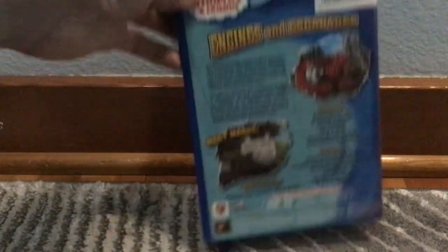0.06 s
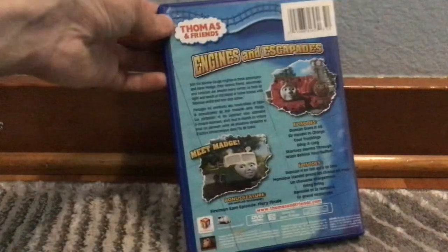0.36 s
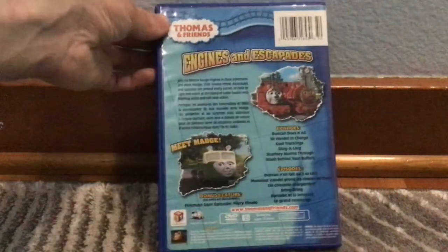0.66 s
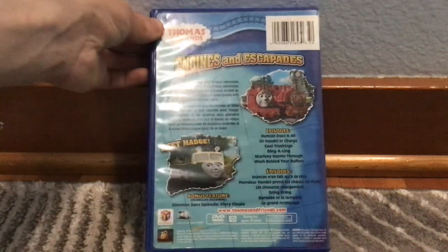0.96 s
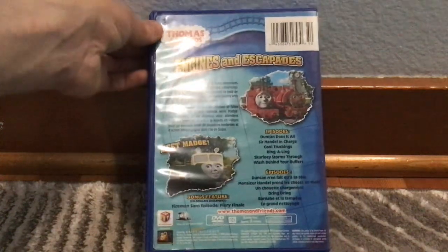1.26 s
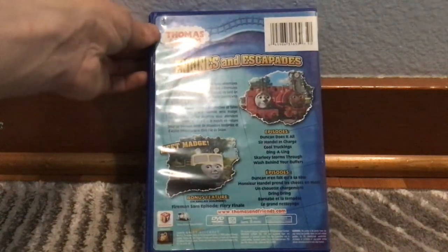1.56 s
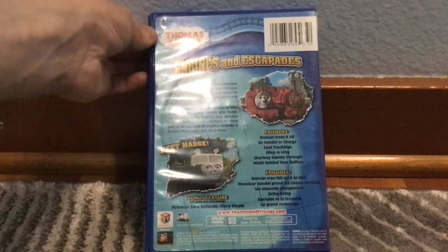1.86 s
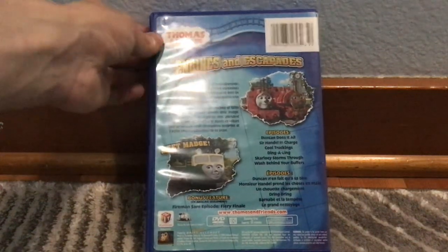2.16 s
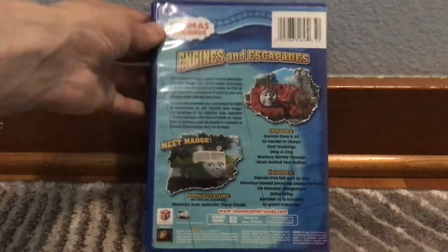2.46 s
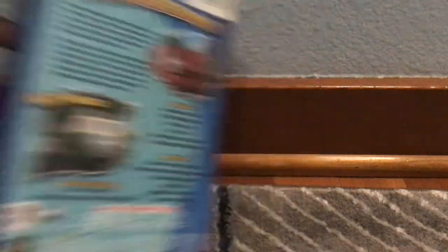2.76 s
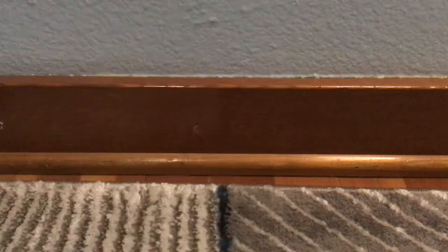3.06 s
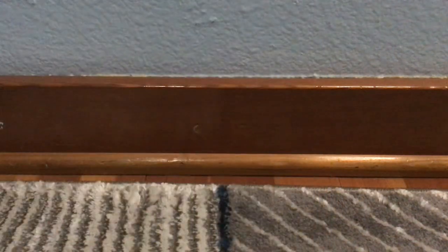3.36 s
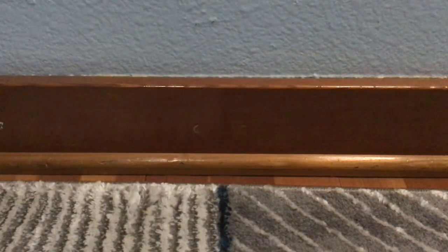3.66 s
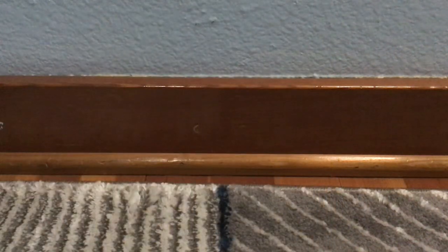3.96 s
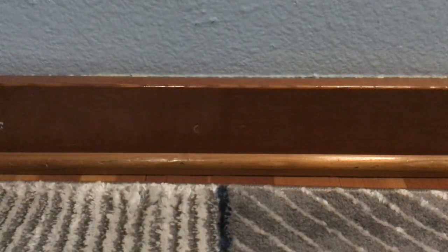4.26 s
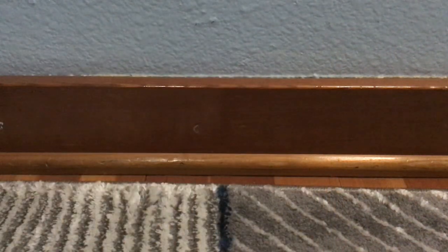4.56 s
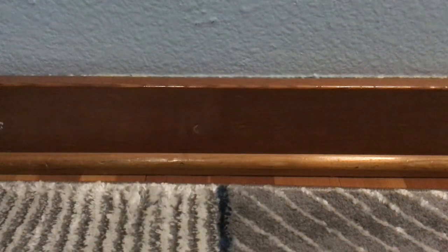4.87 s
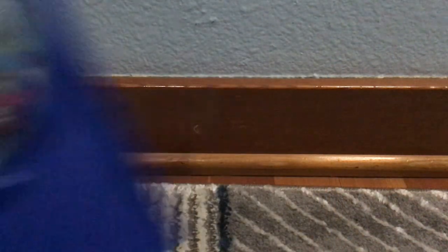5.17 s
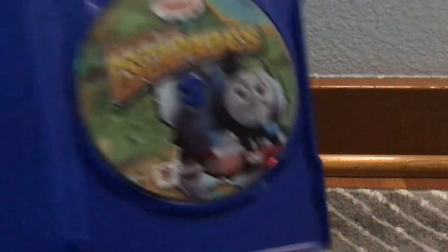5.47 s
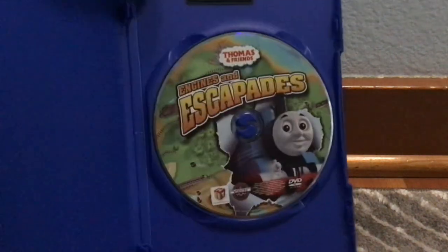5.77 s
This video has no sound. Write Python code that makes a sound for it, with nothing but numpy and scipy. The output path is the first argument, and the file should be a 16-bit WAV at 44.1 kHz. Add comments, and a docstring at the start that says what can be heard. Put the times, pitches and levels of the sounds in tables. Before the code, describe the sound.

A hand knocks a plastic disc case down on a rug, handles it with faint ticks, then snaps it open in a quiet room.

```python
"""Plastic disc case, handled and opened

A hand stands the case on a rug, shifts its grip, lifts it away and snaps it open. It knocks and rocks
to rest, creaks in the grip, and ticks and squeaks as fingers slide on shell and sleeve. The latches
let go in one quick ripple. Small quiet room, appliance hum, one close microphone."""
import sys
import numpy as np
from scipy import signal
from scipy.fft import rfft, irfft
from scipy.io import wavfile
from scipy.ndimage import uniform_filter1d

SR = 44100
rng = np.random.default_rng(int(sys.argv[2]) if len(sys.argv) > 2 else 0)


def wrap_up_sound(samples):
    """Save the sound to the file named by the first command line argument, as 16-bit audio."""
    columns = np.atleast_2d(samples).T
    # keep every value between -1 and 1, then stretch to whole-number steps
    tamed = np.clip(columns, -1, 1)
    steps = np.round(tamed * 32767).astype(np.int16)
    wavfile.write(sys.argv[1], SR, steps)


N = 256220
TAPS = 16384
HZ, AGE_S = np.fft.rfftfreq(TAPS, 1 / SR), np.arange(TAPS) / SR

# Broad shell spectrum. Each row: frequency in Hz, gain in dB.
SHELL = [(100, -6.5), (300, 0), (470, -3.5), (700, 1), (1150, -3.5), (1440, -5), (1700, -3), (2150, -4.5),
         (2500, -4.5), (3750, -4), (5000, -11.5), (7500, -19), (9000, -18.5), (15500, -34.5)]
# Fingers and rug sliding on the case.
# Each row: start in seconds, length in seconds, level in dB, tilt in dB per octave.
STROKES = [(0.076, 0.29, -72, 1.5), (0.434, 0.3, -68, -2.5), (0.683, 0.15, -74, -2.5),
           (.79, 0.17, -73, -1.5), (2.734, 0.067, -70, 7.5), (2.818, 0.36, -77, -5), (3.312, .11, -67, 0),
           (3.393, 0.16, -67, 1), (3.568, 0.055, -67.5, 0), (3.757, 0.22, -79.5, 2),
           (4.082, 0.088, -69.5, 2), (4.166, 0.64, -79.5, 3), (4.623, .08, -71, 9.5),
           (5.104, .16, -78.5, 2.5), (5.287, 0.17, -75, -0.5)]


def amp(db):
    """dB to gain."""
    return 10 ** (np.asarray(db) / 20)


def unit_rms(x):
    """Scale to rms 1."""
    return x / np.sqrt(np.mean(x ** 2) + 1e-20)


def unit_blow(x):
    """Scale to the energy of 12 ms at rms 1."""
    return x / np.linalg.norm(x) * np.sqrt(.012 * SR)


def curve(points, hz):
    """Interpolate a table over log frequency."""
    point_hz, values = np.transpose(points)
    return np.interp(np.log(hz + 1), np.log(point_hz + 1), values)


def add(mix, start_s, sound):
    """Mix a sound in at start_s."""
    part = mix[max(round(start_s * SR), 0):][:len(sound)]
    part += sound[:len(part)]


def colour(x, gain_db):
    """Minimum-phase filter; gain_db lies on the grid HZ."""
    log_gain = np.log(amp(np.r_[gain_db, gain_db[-2:0:-1]]))
    taps = np.fft.ifft(np.exp(np.conj(signal.hilbert(log_gain)))).real
    return signal.fftconvolve(x, taps[:TAPS // 2])[:len(x)]


def drift(samples):
    """Noise at rms 1, smoothed over the given span."""
    return unit_rms(uniform_filter1d(uniform_filter1d(rng.standard_normal(N), samples), samples))


def resonance(hz, width_hz):
    """Power response of one mode, peak 1."""
    return 1 / (1 + (2 * (HZ - hz) / width_hz) ** 2)


def shell_db(tilt_db_oct, damping):
    """Shell response; the grip's damping widens and flattens the modes."""
    # Each row: frequency in Hz, width in Hz, height over the broad spectrum in dB, at damping 1.
    case_modes = [(654, 16, 7), (709, 15, 9), (807, 13, 5), (967, 12, 7), (1002, 11, 9), (1072, 12, 13),
                  (1258, 24, 7), (1610, 16, 6), (1780, 50, 2), (2122, 28, 11), (2570, 14, 9), (2910, 25, 6),
                  (3274, 18, 7), (3438, 40, 7), (3693, 26, 7), (3870, 28, 8), (4170, 110, 6), (4578, 20, 5)]
    modes = sum((amp(db) ** 2 - 1) / damping * resonance(hz, width_hz * damping)
                for hz, width_hz, db in case_modes)
    octaves = np.log2(np.maximum(HZ, 300) / 2000)
    return curve(SHELL, HZ) + 10 * np.log10(1 + modes) + tilt_db_oct * octaves


def spot_db(hz, width_hz, lift_db):
    """Broad resonance favoured by the touched spot."""
    return 10 * np.log10(1 + (amp(lift_db) * resonance(hz, width_hz)) ** 2)


def touched_hz():
    """Crack pitch of a random spot on the shell."""
    return rng.uniform(2200, 3800)


def swell(length_s, peak_share=.31):
    """Stroke pressure: rise, then release."""
    share = np.arange(0, length_s, 1 / SR) / length_s
    return np.sin(np.pi / 2 * np.interp(share, [0, peak_share, 1], [0, 1, 0])) ** 1.08


def burst(hold_s, t60_s, rattle_db, rattle_t60_s):
    """Micro-slips, then a dying rattle; even spectrum, unit energy."""
    after_s = np.maximum(AGE_S - hold_s, 0)
    fade = amp(-60 * after_s / t60_s) + amp(rattle_db - 60 * after_s / rattle_t60_s) + 1e-9
    x = rng.standard_normal(TAPS) * fade
    for _ in range(4):  # flatten the spectrum, restore the envelope
        spectrum = rfft(x)
        x = irfft(spectrum / (abs(spectrum) + 1e-9))
        x = x * fade / np.sqrt(abs(uniform_filter1d(x ** 2, size=64)) + 1e-18)
    return x / np.linalg.norm(x)


def room_air(level_db=-63, waver_db=.1):
    """Low rumble and faint hiss."""
    # Each row: frequency in Hz, relative density in dB.
    spectrum = [(25, -26), (45, -21), (60, 1.5), (100, -1.5), (145, -2.5), (175, -11.5), (280, -15),
                (500, -24.5), (1000, -32.5), (2500, -38.5), (5000, -40.5), (7700, -46), (8700, -41.5),
                (15000, -52.5)]
    air = colour(rng.standard_normal(N + TAPS), curve(spectrum, HZ))[TAPS:]
    return amp(level_db - waver_db * drift(samples=9000)) * unit_rms(air)


def appliance_hum(waver_db=.2, wander_rad=.12):
    """Tones wavering slightly in level and phase."""
    # Each row: frequency in Hz, rms level in dB.
    tones = [(59, -72.5), (225.2, -65), (421, -97.5), (1048, -103)]
    t = np.arange(N) / SR
    out = np.zeros(N)
    for hz, db in tones:
        peak = np.sqrt(2) * amp(db + waver_db * drift(samples=8000))
        phase = 2 * np.pi * (hz * t + rng.random()) + wander_rad * drift(samples=12000)
        out += peak * np.sin(phase)
    return out


def slides(slips_per_s=1200, spread_db=1.5, hiss_gain=.54, judder_db=2.5):
    """Friction: clumps of tiny slips stir the shell's damped modes."""
    # Each row: frequency in Hz, gain in dB.
    rub_spectrum = [(100, 0.5), (400, 0.5), (900, -1.5), (1500, -4.5), (2300, -3.5), (4000, -9.5),
                    (6000, -12), (15500, -28.5)]
    slips = rng.standard_normal(N) * amp(spread_db * np.minimum(rng.exponential(1, N), 3))
    slips *= rng.random(N) < slips_per_s / SR
    drive = unit_rms(slips) + hiss_gain * rng.standard_normal(N)
    drive *= amp(judder_db * drift(samples=300))
    out = np.zeros(N)
    for start_s, length_s, db, tilt_db_oct in STROKES:
        pressure = swell(length_s)
        gain_db = curve(rub_spectrum, HZ) + shell_db(tilt_db_oct, damping=4) - curve(SHELL, HZ)
        rub = colour(drive[round(start_s * SR):][:len(pressure)], gain_db)
        add(out, start_s, amp(db) * pressure * unit_rms(rub))
    return out


def tick(body_db, body_hz, hard_db, crack_hz, fizz_db=-14, echo_gain=.73, echo_s=.003):
    """One crackle of the gripped shell: body, crack at hard_db re body, sleeve fizz re crack."""
    spot = spot_db(body_hz, width_hz=130, lift_db=10.5) + spot_db(crack_hz, width_hz=190, lift_db=5.5)
    # Echoes off the panel's edges hollow the spectrum.
    echoes = sum(np.exp(-2j * np.pi * HZ * lag_s) for lag_s in echo_s * (.5 + rng.random(3)))
    hollow_db = 20 * np.log10(abs(1 + echo_gain * echoes) + .0011)
    slips = burst(hold_s=.001, t60_s=.014, rattle_db=-26.5, rattle_t60_s=.075)
    blow = colour(slips, shell_db(tilt_db_oct=-.7, damping=5.5) + spot + hollow_db)
    out = np.zeros(TAPS)
    for edges_hz, db in ((200, 1400), 0), ((1400, 5500), hard_db), ((5500, 17000), hard_db + fizz_db):
        band = signal.butter(3, edges_hz, "bandpass", fs=SR, output="sos")
        out += amp(body_db + db) * unit_blow(signal.sosfilt(band, blow))
    return out


def finger_taps():
    """Fingers tap the shell as the grip changes."""
    # Each row: start in seconds, body level in dB, body pitch in Hz, hardness in dB.
    taps = [(0.09, -73, 1050, -3), (0.135, -68.5, 1070, -19), (0.174, -60.5, 650, -3.5),
            (0.364, -71, 420, -2.5), (0.6425, -66, 1090, -1), (1.586, -67, 553, -3.5),
            (2.322, -74, 650, 1.5), (2.5766, -69.5, 670, -2), (2.756, -72.5, 420, -2.5),
            (2.827, -70, 950, 1.5), (2.942, -73.5, 543, 1), (3.064, -61.5, 810, 0.5),
            (3.1134, -69.5, 830, -1.5), (3.423, -65, 1250, -4), (3.4448, -56.5, 710, 6),
            (3.5295, -65, 890, -10), (4.124, -70, 1080, 8.5), (4.228, -61.5, 740, -14.5),
            (4.282, -63.5, 701, -0.5), (4.458, -73.5, 1146, 3), (4.541, -79, 706, 9),
            (5.142, -70, 805, -5.5), (5.219, -72.5, 418, -3.5), (5.319, -75.5, 535, -0.5)]
    out = np.zeros(N)
    for start_s, db, hz, hard_db in taps:
        add(out, start_s, tick(db, hz, hard_db, touched_hz()))
    return out


def catches(per_stroke=3, offset_db=-8, spread_db=2, centre_hz=850, hard_db=-1):
    """Each stroke catches faintly at random moments."""
    out = np.zeros(N)
    for start_s, length_s, stroke_db, _ in STROKES:
        for share, strength, pitch in rng.random((per_stroke, 3)):
            db = stroke_db + offset_db + spread_db * (2 * strength - 1)
            hz = centre_hz * 2 ** (pitch - .5)
            add(out, start_s + share * length_s, tick(db, hz, hard_db, touched_hz()))
    return out


def knocks(crack_hz=3240, edge_lag_s=.0055, rebounds=4, gap_growth=1.2, fall_db=3.5, loss_db_per_s=400):
    """The case lands on one edge, then the other, and rocks to rest in ever weaker rebounds."""
    # Each row: start in seconds, body level in dB, body pitch in Hz, hardness in dB,
    # first rocking gap in seconds.
    landings = [(0.1835, -49.5, 539, 4.5, .008), (0.452, -48.5, 590, -8.5, 0.021)]
    out = np.zeros(N)
    for start_s, db, hz, hard_db, gap_s in landings:
        far_edge_s = start_s + edge_lag_s
        add(out, start_s, tick(db, hz, hard_db, crack_hz))
        add(out, far_edge_s, tick(db - 10.5, hz, hard_db / 2 - 3, crack_hz))
        rebound_db = db - 6.5 - loss_db_per_s * gap_s
        for k, lag_s in enumerate(np.cumsum(gap_s * gap_growth ** np.arange(rebounds))):
            add(out, far_edge_s + lag_s, tick(rebound_db - fall_db * k, hz, hard_db / 2, crack_hz))
    return out


def thumps(rise_s=.00068):
    """A whole panel bends and springs back in damped cycles; at the snap, the lowest thump is a puff of air as
    the halves part."""
    # Each row: start in seconds, level in dB, pitch in Hz, t60 in seconds.
    flexes = [(0.187, -49.5, 241, 0.045), (0.453, -38.5, 447, 0.019), (0.452, -47, 158, 0.054),
              (2.044, -61, 570, 0.032), (3.936, -30.5, 91, 0.11), (3.934, -41.5, 287.4, 0.073),
              (3.945, -41.5, 191.9, 0.19)]
    out = np.zeros(N)
    for start_s, db, hz, t60_s in flexes:
        envelope = amp(db - 60 * AGE_S / t60_s) * (1 - np.exp(-AGE_S / rise_s))
        add(out, start_s, envelope * np.sin(2 * np.pi * hz * AGE_S))
    return out


def squeaks():
    """Skin sticks and slips on the sleeve: a swelling band of noise."""
    # Each row: start in seconds, length in seconds, level in dB, centre in Hz, width in Hz.
    skin_slips = [(1.584, .008, -73, 13900, 6000), (2.204, 0.033, -59.5, 602, 157),
                  (4.521, 0.0089, -64, 11600, 3540), (4.615, 0.083, -73.5, 3850, 792),
                  (4.991, 0.025, -78, 2740, 299)]
    out = np.zeros(N)
    for start_s, length_s, db, hz, width_hz in skin_slips:
        pressure = swell(length_s)
        band_db = np.maximum(20 * np.log10(resonance(hz, width_hz)), -60)
        squeak = colour(rng.standard_normal(len(pressure)), band_db)
        add(out, start_s, amp(db) * pressure * unit_rms(squeak))
    return out


def creaks(gap_s=.012, fall_db=2.5):
    """The squeezed shell gives way in a short run of weakening slips."""
    # Each row: start in seconds, length in seconds, body level in dB, body pitch in Hz, hardness in dB.
    squeezes = [(2.213, .03, -65, 620, -8), (2.8586, .02, -61.5, 930, -2), (3.004, .03, -64, 880, 1.5),
                (3.338, .03, -70, 690, 7), (3.447, .03, -61.5, 740, 0)]
    out = np.zeros(N)
    for start_s, length_s, db, hz, hard_db in squeezes:
        crack_hz = touched_hz()
        for k, lag_s in enumerate(np.arange(0, length_s, gap_s)):
            add(out, start_s + lag_s, tick(db - fall_db * k, hz, hard_db, crack_hz))
    return out


def latch_snap():
    """The latches slip in quick succession; both halves of the case ring freely."""
    # Each row: start in seconds, level in dB, ripple length in seconds, tilt in dB per octave.
    latches = [(3.931, -28.5, .008, -.5), (3.945, -25.5, .0055, 1)]
    out = np.zeros(N)
    for start_s, db, ripple_s, tilt_db_oct in latches:
        slips = burst(hold_s=ripple_s, t60_s=.028, rattle_db=-16, rattle_t60_s=.17)
        ring = colour(slips, shell_db(tilt_db_oct, damping=.93))
        add(out, start_s, amp(db) * unit_blow(ring))
    return out


def reflections(x, wet_db=-11, taps_per_s=4000, gap_s=.0022, build_s=.0035):
    """Sparse room echoes of random sign, each band dying at its own rate."""
    # Each row: frequency in Hz, t60 in seconds.
    decay = [(100, 0.36), (700, 0.37), (2000, 0.33), (4500, 0.3), (12000, .23)]
    taps = rng.choice([-1., 1.], SR) * (rng.random(SR) < taps_per_s / SR)
    hz, t, bands = signal.stft(taps, SR, nperseg=256)
    bands *= amp(-60 * t / curve(decay, hz)[:, None])
    tail = signal.istft(bands, SR, nperseg=256)[1][:SR]
    tail *= np.clip((np.arange(SR) / SR - gap_s) / build_s, 0, 1)
    return amp(wet_db) * signal.fftconvolve(x, tail / np.linalg.norm(tail))[:N]


def scene():
    """The handled case in its room, mono."""
    background = room_air() + appliance_hum()
    case = slides() + finger_taps() + catches() + knocks() + thumps()
    case += squeaks() + creaks() + latch_snap()
    return (case + reflections(case) + background)[None]


def record(dry, low_hz=47, high_hz=15800):
    """Microphone bass cut, then band limit."""
    bass_cut = signal.butter(6, low_hz, "highpass", fs=SR, output="sos")
    band_limit = signal.firwin(511, high_hz, window=("kaiser", 9), fs=SR)
    return signal.oaconvolve(signal.sosfilt(bass_cut, dry), band_limit[None], "same")


dry = scene()
out = record(dry)
wrap_up_sound(out)
```